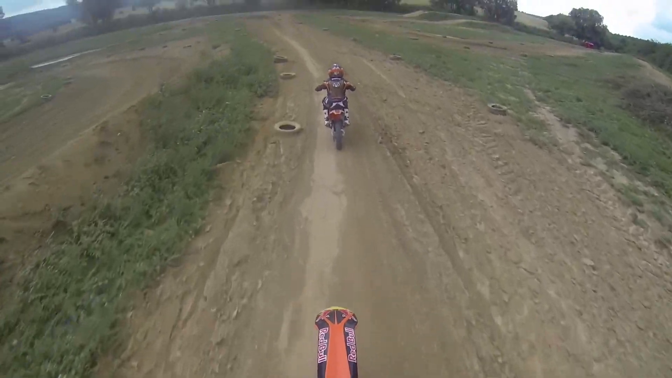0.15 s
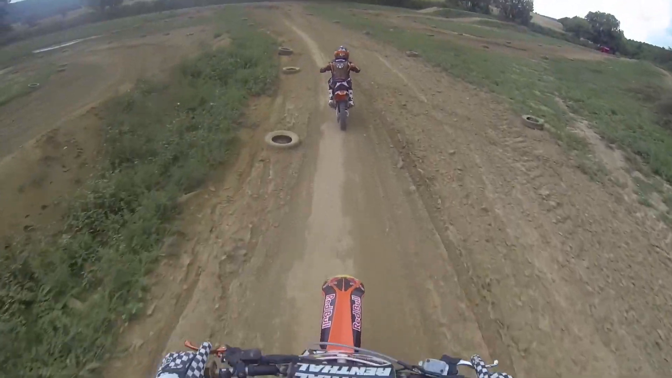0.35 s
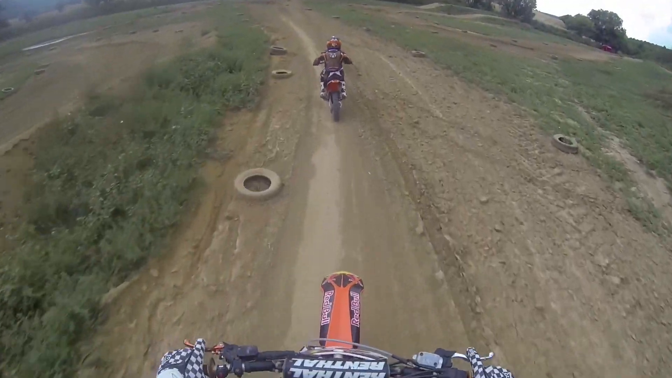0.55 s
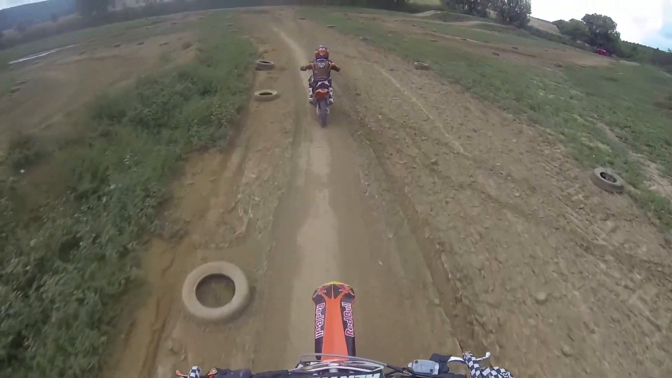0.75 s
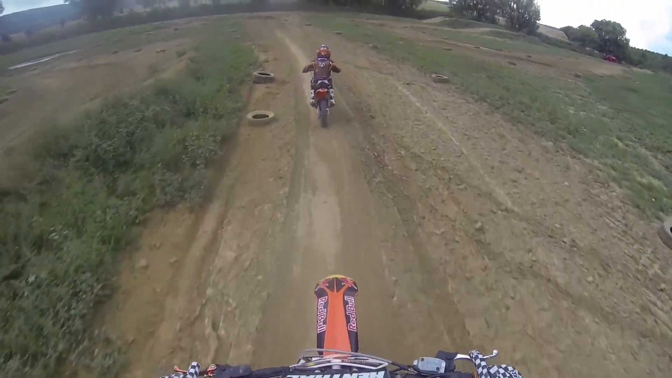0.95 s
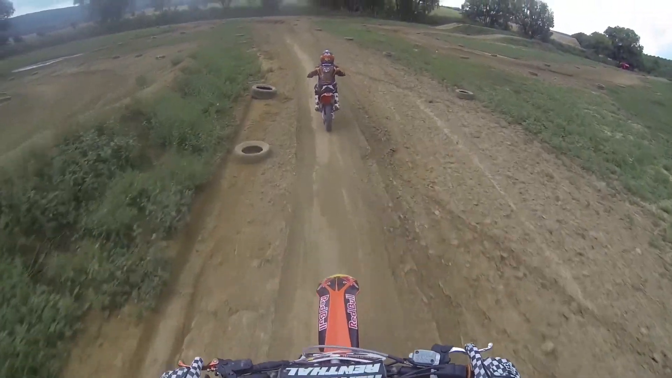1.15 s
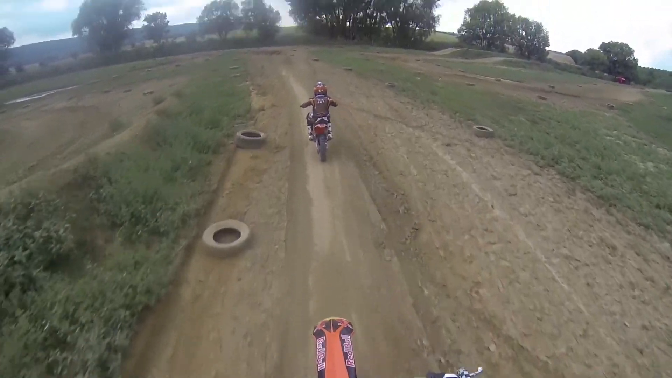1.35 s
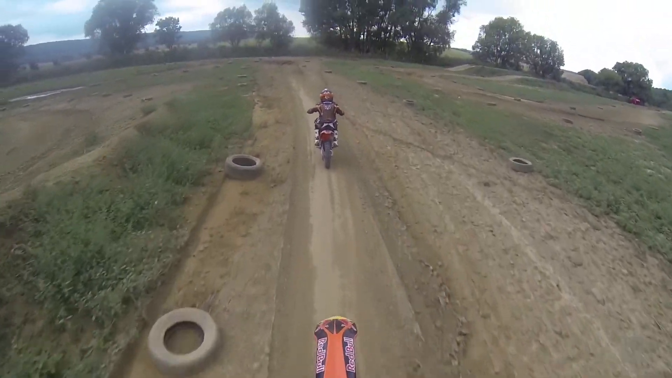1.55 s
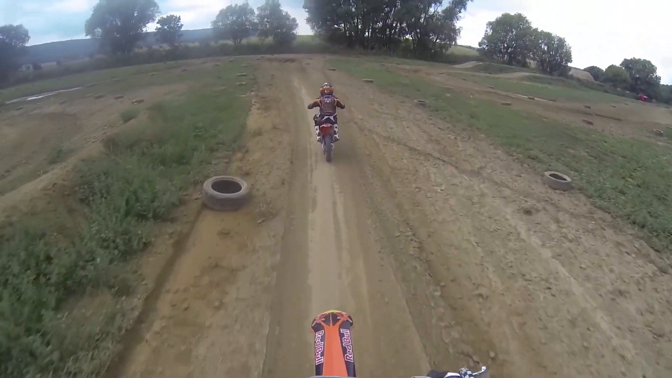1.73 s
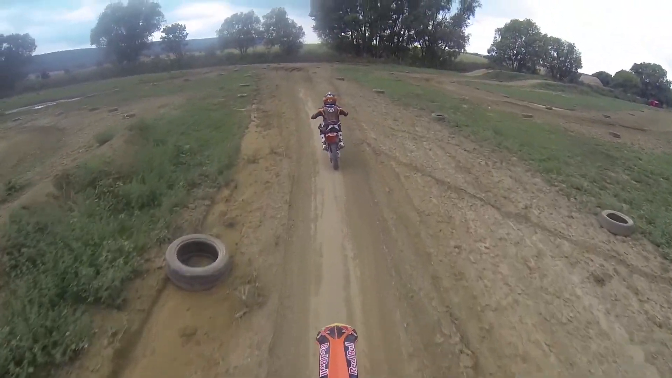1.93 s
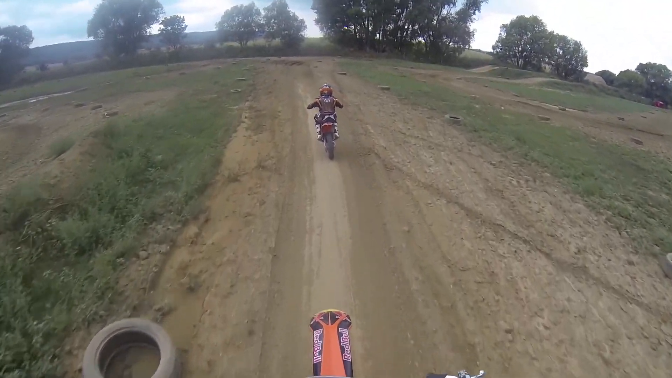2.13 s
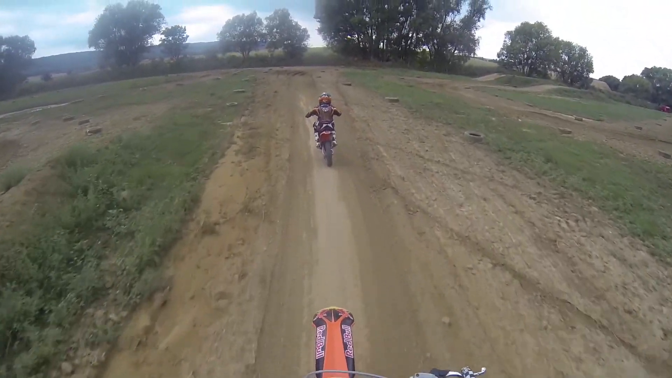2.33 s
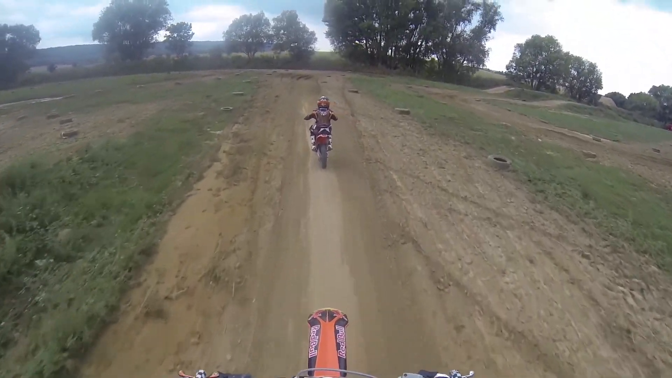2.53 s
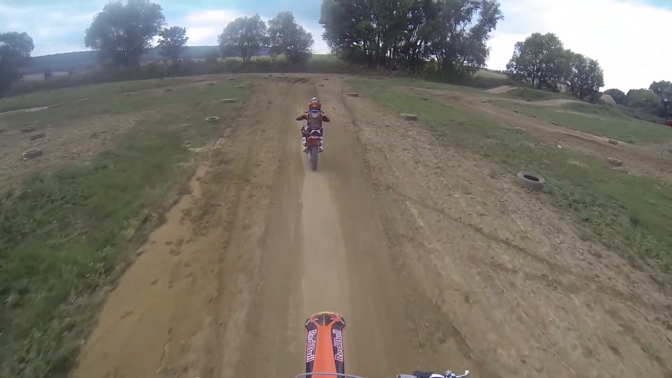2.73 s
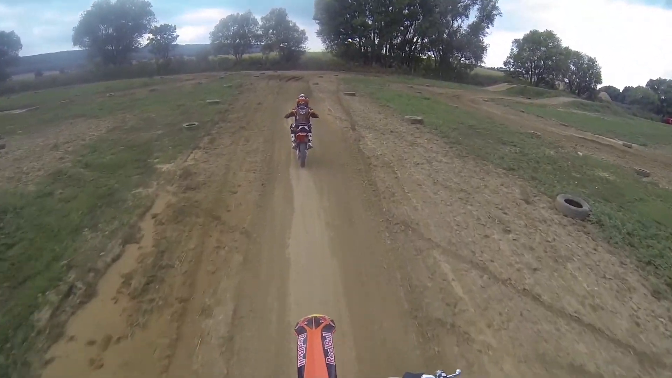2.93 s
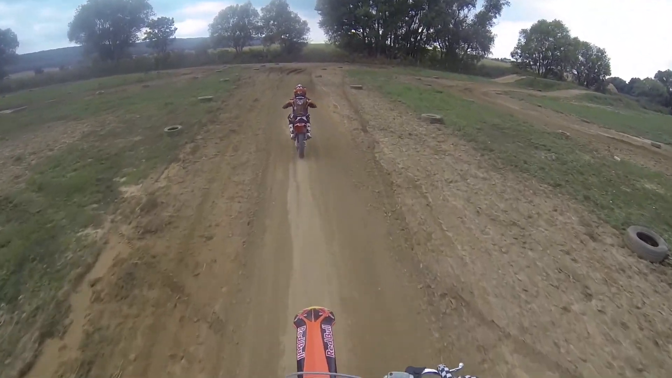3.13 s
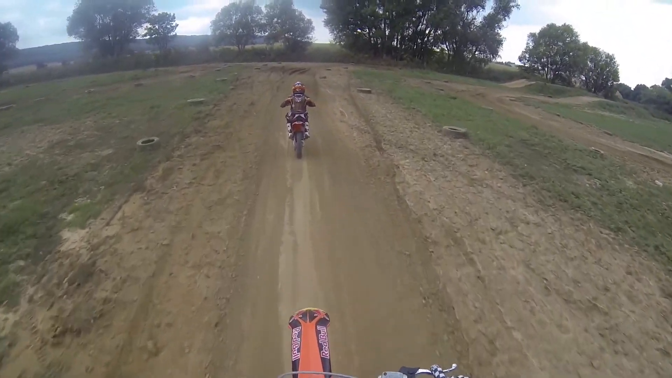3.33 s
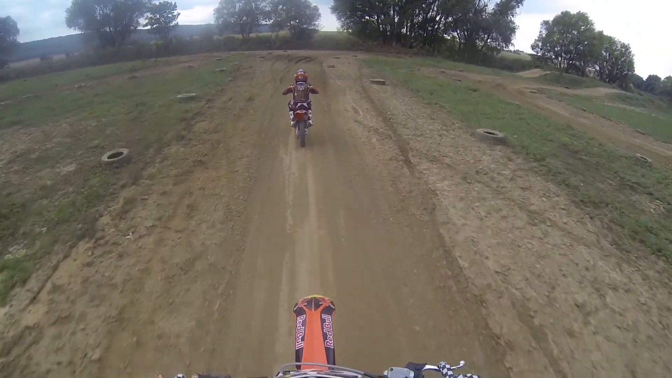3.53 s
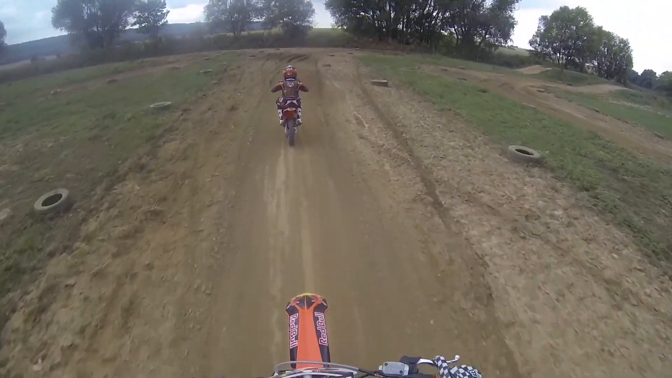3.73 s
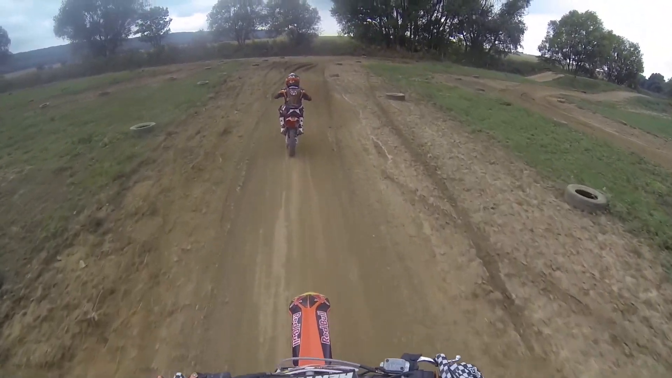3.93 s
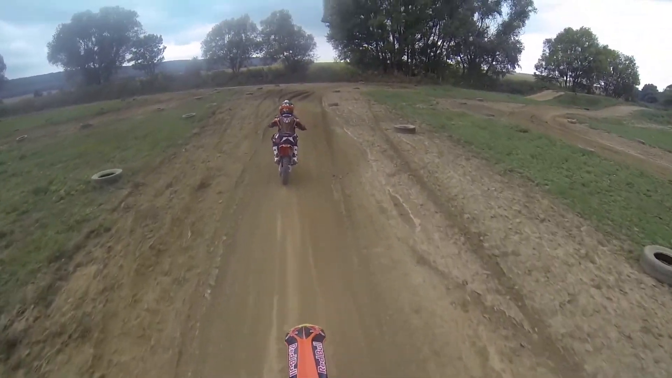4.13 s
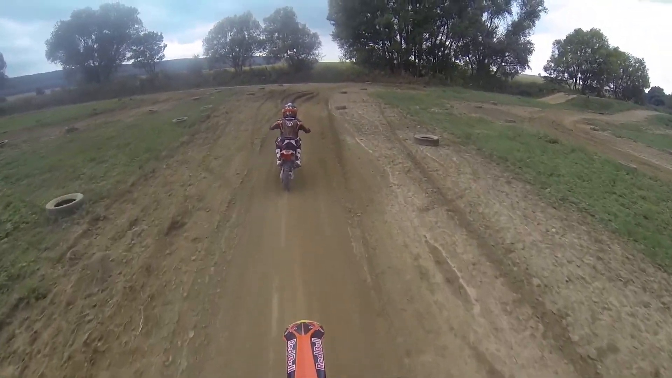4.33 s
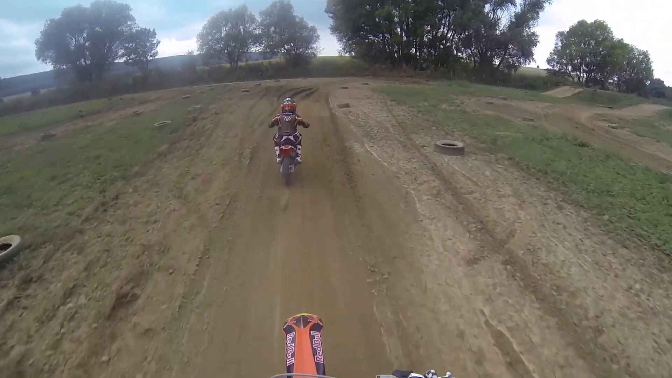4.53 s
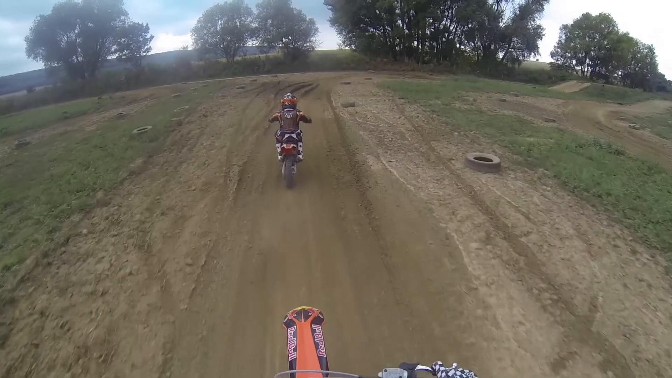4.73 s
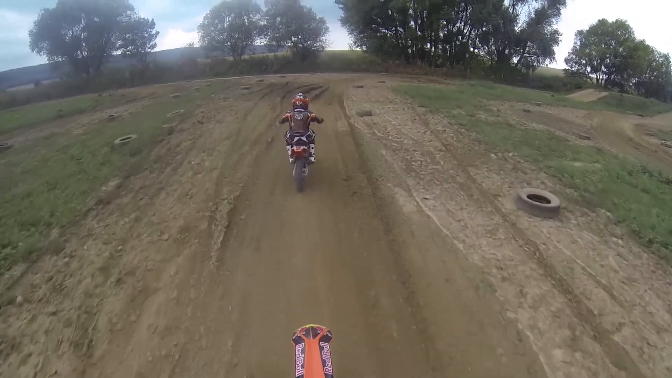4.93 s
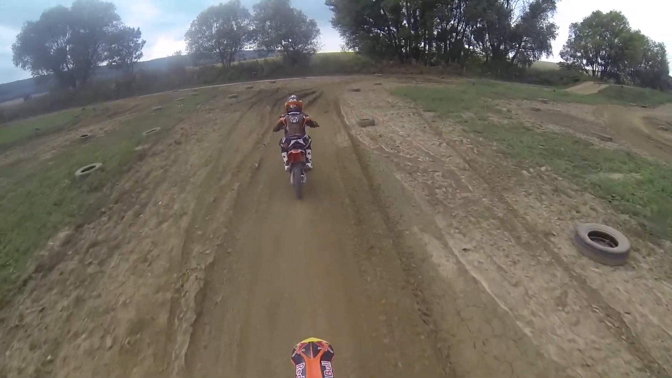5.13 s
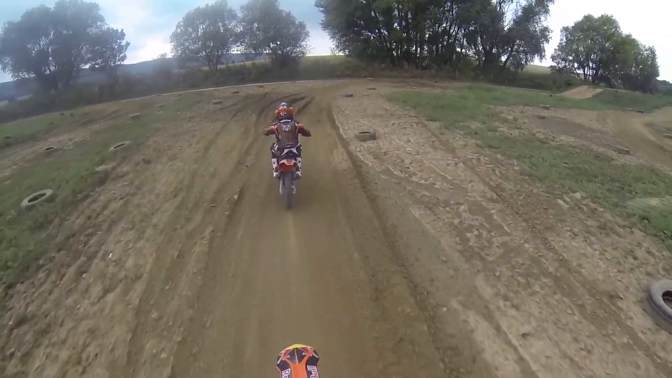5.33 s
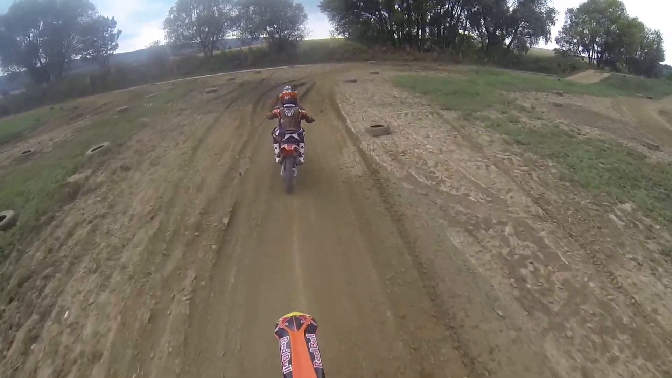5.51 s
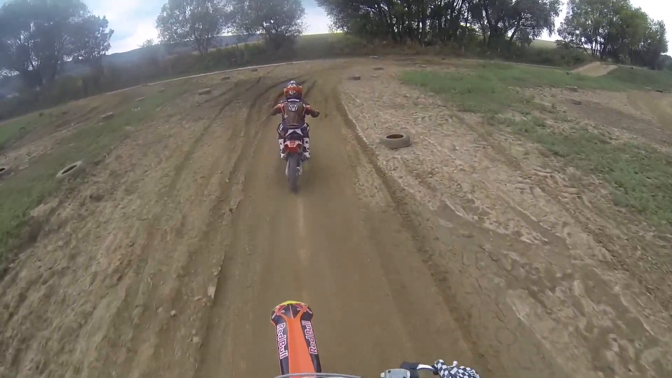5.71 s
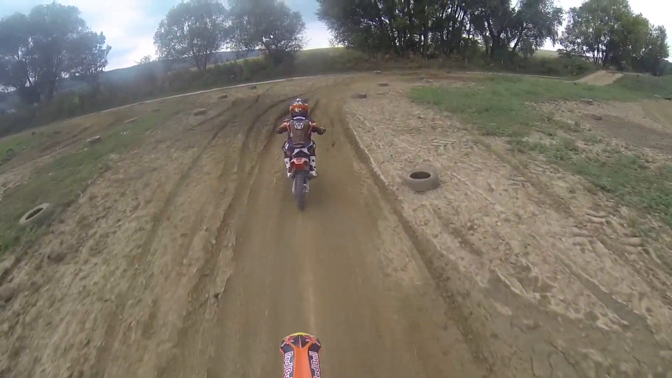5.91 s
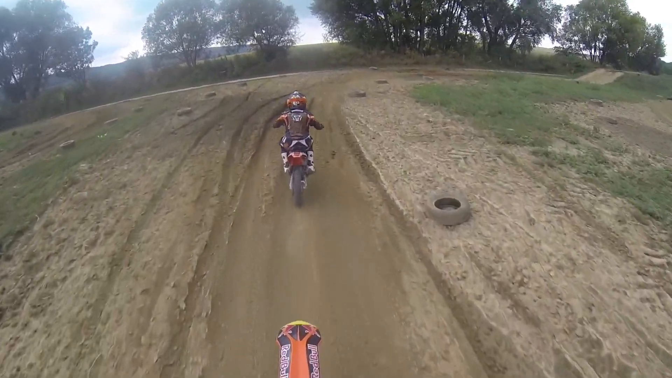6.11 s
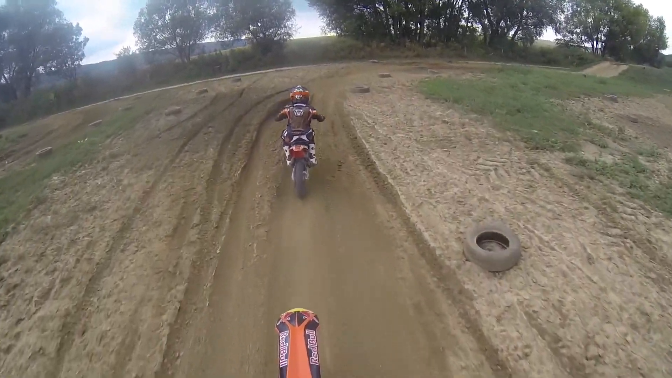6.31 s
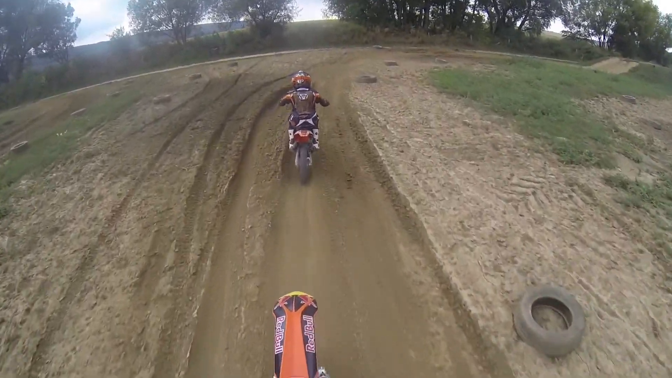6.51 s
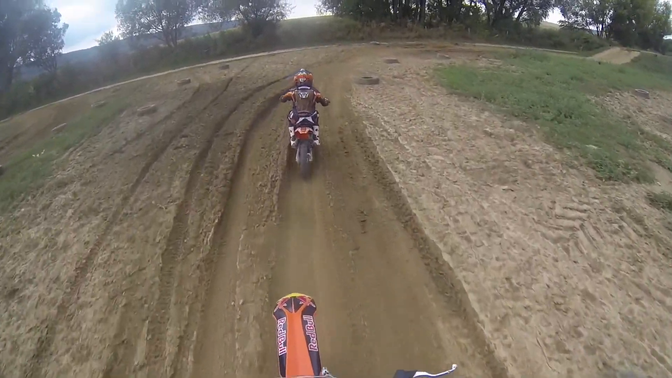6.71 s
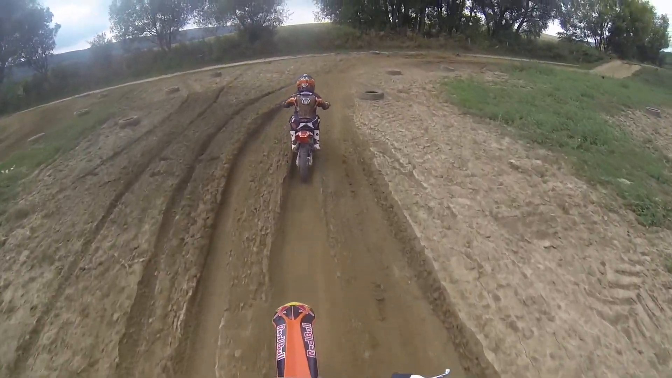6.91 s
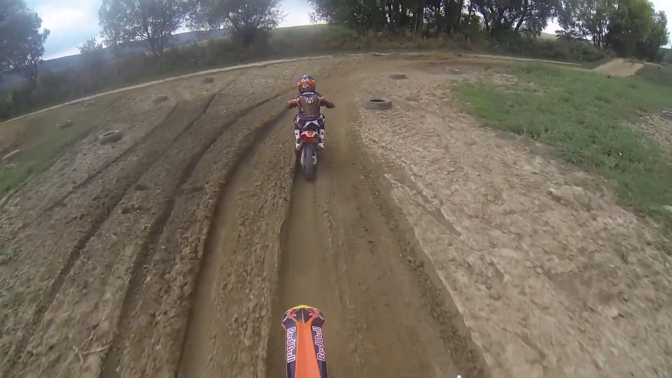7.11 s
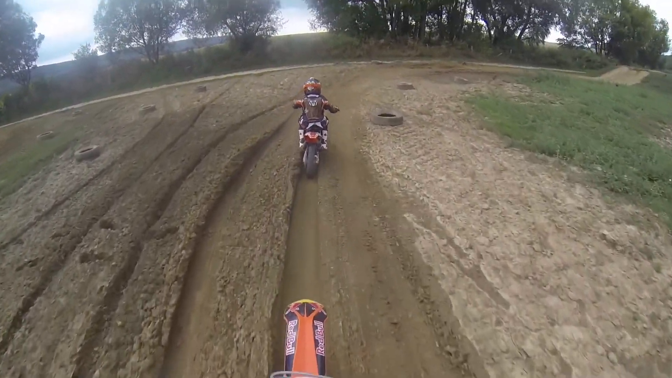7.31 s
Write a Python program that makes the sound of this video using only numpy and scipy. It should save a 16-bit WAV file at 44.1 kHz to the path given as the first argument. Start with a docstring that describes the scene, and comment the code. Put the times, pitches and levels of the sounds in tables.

```python
"""A low engine throb, wind rumble and hollow rush are heard at once, over the buzz of a small two-stroke ahead.
A camera in a sealed case rides a single-cylinder four-stroke dirt bike: crank orders shake the case as
sine lines, and firings excite resonances. Noise in puffs rings the cavities of the case as air and rasp,
shaped noise buffets the microphone, and resonance-weighted harmonics make the two-stroke.
Thrown stones, grit and exhaust pops ring decaying modes; a gain control acts on the sum."""
import sys
import numpy as np
from scipy import signal
from scipy.fft import rfft, irfft
from scipy.io import wavfile
from scipy.ndimage import uniform_filter1d

SR = 44100
rng = np.random.default_rng(int(sys.argv[2]) if len(sys.argv) > 2 else 0)


def store_wav(level_fs):
    """Save 16-bit WAV to argv[1]."""
    pcm = np.round(np.clip(np.atleast_2d(level_fs), -1, 1) * 32767)
    wavfile.write(sys.argv[1], SR, pcm.T.astype(np.int16))


N = 328986  # samples

# Speed of the crank. Each row: time in seconds, turns in Hz.
CRANK_SPEED = [(0, 62.7), (.2, 59.5), (1.49, 58.93), (1.66, 55.44), (1.85, 59.9), (2.02, 56.46), (2.3, 58),
               (2.55, 64), (2.66, 61.6), (3.35, 67.3), (3.59, 67), (3.75, 65), (4.0, 68), (4.35, 67.5),
               (4.67, 65.16), (5.01, 62.56), (5.19, 51.5), (5.36, 49.43), (5.6, 40.73), (6.92, 41),
               (7.01, 50.5), (7.06, 48.5), (7.135, 40), (7.18, 48), (7.3, 55), (7.335, 62), (7.46, 67)]
# Engine load. Each row: time in seconds, share of the noise in firing puffs (0-1, scaled down for air and rasp).
PUFF_SHARE = [(4.2, .33), (5.5, .15), (6.88, .15), (6.93, .98), (7.46, .95)]
# Shaking of the case by the first crank order. Each row: time in seconds, level in dB.
FIRST_ORDER = [(0, -37), (.45, -44), (.62, -32.5), (1.05, -30), (1.49, -24), (1.62, -31), (2.01, -24.5),
               (2.18, -31), (2.4, -23), (2.66, -30), (3.51, -20), (3.78, -24.5), (3.95, -21.5),
               (4.22, -19.5), (4.43, -27), (4.82, -19), (5.01, -27.5), (5.19, -27.5), (5.5, -35.5),
               (5.62, -40), (6.5, -57.5), (6.63, -30), (6.92, -33), (7.21, -24.5), (7.36, -31.5),
               (7.46, -28.5)]
# Second crank order. Each row: time in seconds, level in dB.
SECOND_ORDER = [(5.5, -44), (5.56, -54), (5.66, -44), (6.13, -54), (6.25, -42), (6.57, -51), (6.65, -40),
                (7.0, -45)]
# Half order, swelling as the bike starts to pull: from and to in seconds, level within and outside in dB.
HALF_ORDER = (2.52, 3.62, -33, -52)
# Upper crank orders. Each row: multiple of crank turns, level in dB over the thud before STEADY_PULL is added.
UPPER_ORDERS = [(2.5, 1.5), (3, -3), (3.5, -6), (4.5, -11)]
# Upper orders firm up under steady pull: from and to in seconds, change within and outside in dB.
STEADY_PULL = (2.3, 5.05, -4, -10)
# Rush and thud. Each row: time in seconds, rush of air in dB, exhaust thud in dB.
RUSH_AND_THUD = [(0, -35, -41), (.98, -37, -43.5), (1.06, -34.5, -43), (1.18, -36.5, -44),
                 (2.3, -35.5, -40), (3.4, -33.5, -39), (4.2, -35.5, -41), (4.95, -35.5, -41),
                 (5.5, -42, -43.5), (6.35, -43.5, -46), (6.88, -41.5, -50.5), (6.95, -41.5, -42.5),
                 (7.05, -36.5, -41), (7.12, -39, -41), (7.46, -38, -41.5)]
# Spectrum of the dull thud. Each row: frequency in Hz, relative density in dB per Hz.
THUD_SPECTRUM = [(60, -17), (120, 1.5), (190, 0.5), (290, -3), (430, -5), (520, -14.5), (900, -16),
                 (1100, -28.5), (4000, -99)]
# Exhaust pipe resonances, rung by each sharp firing. Each row: centre in Hz, width of one pass in Hz, relative dB.
PIPE_RESONANCES = [(150, 75, -3.5), (261.2, 68, 0.5), (414, 200, -16)]
FIRING_S = 7.157  # the moment of one firing
# Cavities of the case. Each row: centre in Hz, nominal width in Hz, relative level in dB.
CASE_CAVITIES = [(779, 190, -16), (1349, 218, 3), (1583, 246, 0), (2130, 420, -6.5), (2348, 120, -6),
                 (2984, 130, -12.5), (3163, 227, -11), (3720, 310, -18.5), (5136, 480, -29),
                 (6510, 550, -33), (7900, 500, -46.5), (10160, 630, -47)]
# Broad hiss between the cavities. Each row: frequency in Hz, relative level in dB.
HISS_SPECTRUM = [(400, -20.5), (4000, -30), (7000, -44), (12000, -54), (13900, -57), (14400, -66.5)]
# Cavities near 3 kHz, rung by the rasp. Each row: time in seconds, relative level in dB.
RASP_LEVEL = [(0, -3.5), (1.1, 0.5), (2.1, -1), (2.6, 2.5), (3.3, 1), (5.1, 2), (7.2, 4)]
RASP_LEAD = .32  # crank turns by which the rasp comes before the thud
TREBLE_DB = -16.5  # steady treble against the rush of air
FRESH_DB, FRESH_S = 3, 0.44  # the treble starts out rougher and brighter, then settles
# Short treble bursts: early ones perhaps sprayed dirt, those near 7 s in time with the exhaust rasp.
# Each row: time in seconds, dB over the steady treble.
TREBLE_BURSTS = [(.4, 4), (1.555, 6), (1.59, 7), (6.98, 3), (7.033, 7), (7.064, 10), (7.153, 4), (7.2, 4)]
# Wind buffeting. Each row: time in seconds, level in dB.
BUFFET_LEVEL = [(0, -30.5), (1.6, -31.5), (5.2, -37), (5.7, -40)]
# Spectrum of the buffeting. Each row: frequency in Hz, relative density in dB per Hz.
BUFFET_SPECTRUM = [(3, 1), (12, 11), (30, -2), (85, 3), (130, -26), (300, -71), (2000, -110)]
# Gusts. Each row: time in seconds, dB over the buffeting.
WIND_GUSTS = [(1.35, 6), (5.28, 14), (5.85, 2.5)]
GUST_S = 0.042  # from the peak of a gust until its dB swell has fallen to 1/e
# The two-stroke, one table a burst of throttle. Each row: time in seconds, firings in Hz,
# then the low, middle and top resonance levels in dB.
TWO_STROKE_BURSTS = [
    [(0, 127, -49, -62, -62), (.136, 131.8, -51, -55, -64), (.262, 126.3, -53, -52, -66),
     (.408, 134.6, -52, -54, -62), (.54, 122.3, -64, -48, -57), (.666, 123.7, -61, -49, -58),
     (.84, 117.8, -61, -53, -66), (1.08, 124.6, -60, -48, -55), (1.228, 113.8, -60, -56, -55),
     (1.45, 114.4, -59, -63, -53), (1.49, 117.3, -65, -51, -58), (1.56, 117.7, -64, -49, -54),
     (1.6, 121, -66, -59, -64), (1.75, 118.7, -72, -59, -66)],
    [(6.97, 74, -64, -62, -70), (7.07, 77.6, -56, -58, -66), (7.19, 75.5, -57, -62, -70),
     (7.25, 78.2, -54, -58, -68), (7.36, 78, -68, -69, -72)],
]
# Exhaust resonances of the two-stroke. Each row: centre in Hz, width in Hz.
TWO_STROKE_CHAMBER = [(650, 150), (850, 140), (1020, 90)]
# The two-stroke rings the main cavity of the case: centre in Hz, width in Hz, until seconds, dB before, dB after.
CASE_LEAK = (1350, 150, 1.15, -43, -55)
STUTTER_S, STUTTER_DB = .42, -3  # end of the stutter, and level of its lines against whole multiples
# Grit. Each row: time in seconds, peak in dB, tilt of the ring in dB an octave.
GRIT_HITS = [(3.7155, -16, 0), (3.7284, -30, -6), (3.7389, -28, -4)]
# Modes of grit on the mount. Each row: frequency in Hz, relative level in dB, 60 dB decay in seconds.
MOUNT_MODES = [(820, -1, .012), (1400, 1, .01), (3780, 3, .011), (5340, 0, .014), (8630, 0, .016),
               (13300, -13, .004)]
# A stone. Each row: time in seconds, peak in dB, tilt of the ring in dB an octave.
STONE_HITS = [(3.967, -.3, 0)]
# Modes of the case and metal behind it. Each row: frequency in Hz, relative level in dB, 60 dB decay in seconds.
METAL_MODES = [(850, -22, .016), (1400, -15, .015), (2250, -21, .012), (3850, -17, .014), (5120, -9, .017),
               (6340, 0, .018), (8180, -9, .007), (10950, -21, .008), (12600, -36, .012), (4897, -31, .15),
               (5561, -33, .19), (5657, -33, .21), (6460, -41, .3), (6760, -35, .085), (7208, -46, .1)]
# Exhaust pops of the two-stroke. Each row: time in seconds, peak in dB, tilt of the ring in dB an octave.
EXHAUST_POPS = [(6.7417, -41, 0), (6.7696, -42, 0), (6.799, -45, 0)]
# Modes of a pop. Each row: frequency in Hz, relative level in dB, 60 dB decay in seconds.
POP_MODES = [(660, 0, .03), (810, -1, .03)]
LIMIT_DB, RECOVER_DB_PER_S = -13, 40  # gain control: threshold, and fall of its level detector
SQUEEZE = .55  # dB of reduction for each dB over the threshold
WHINE_HZ, WHINE_DB = 11000, -71.5  # camera electronics: pitch, and mean level of the peaks
EDGE_HZ = 15250  # band limit


def gain_of(db):
    """Decibels are twenty times the logarithm of an amplitude ratio; this inverts them."""
    return 10 ** (np.asarray(db) / 20)


def evened(x):
    """Normalisation: dividing by the root mean square leaves rms 1."""
    return x / np.sqrt(np.mean(x ** 2) + 1e-20)


def curves(rows):
    """Linear interpolation in time turns each column after the first into N samples."""
    s, *columns = np.transpose(rows)
    return [np.interp(np.arange(N) / SR, s, c) for c in columns]


def window(start, end, in_db, out_db):
    """Piecewise-linear envelope: a level in dB that differs for a while."""
    return curves([(start - .1, out_db), (start, in_db), (end, in_db), (end + 0.17, out_db)])[0]


def read(points, hz):
    """Spectral interpolation: dB points on a logarithmic frequency axis become gains."""
    f, db = np.transpose(points)
    return gain_of(np.interp(np.log(hz + 1), np.log(f + 1), db))


def coloured(x, shape):
    """Minimum-phase filtering: a folded cepstrum makes the gain shape(hz) causal; the result has rms 1."""
    cepstrum = irfft(np.log(shape(np.fft.rfftfreq(16384, 1 / SR)) + 1e-6))
    cepstrum[1:8192] *= 2
    cepstrum[8193:] = 0
    impulse_response = irfft(np.exp(rfft(cepstrum)))
    return evened(signal.oaconvolve(x, impulse_response)[:N])


def drift(hz):
    """Low-passed chance: slow random variation of rms 1."""
    rate = 400  # steps a second
    steps = rng.standard_normal(int(N / SR * rate) + 2)
    steps = signal.lfilter(*signal.butter(1, np.clip(hz / 200, .001, .95)), steps)
    return evened(np.interp(np.arange(N) / SR * rate, np.arange(len(steps)), steps))


def resonate(x, hz, width):
    """Heterodyne resonance: shift hz to zero, smooth with one pole, shift back; peak gain 1."""
    turn = np.exp(2j * np.pi * np.cumsum(hz * np.ones(len(x))) / SR)
    r = np.exp(-np.pi * width / SR)
    return 2 * (turn * signal.lfilter([1 - r], [1, -r], x / turn)).real


def puffed(turns, share, duty, uneven_db):
    """Amplitude-modulated noise: part steady, part in one dying puff for every second crank turn."""
    cycle = turns / 2
    strength = gain_of(uneven_db * rng.standard_normal(1000))[cycle.astype(int)]
    decay = np.exp(-(cycle % 1) / duty)
    puffs = evened(uniform_filter1d(strength * decay, size=200))  # soft start
    share = np.clip(share, 0, 1)
    return rng.standard_normal(N) * np.sqrt(1 - share + share * puffs ** 2)


def patchy(x, depth_db):
    """Time-frequency modulation: louder and quieter clumps, a few hundred Hz wide and some 40 ms long."""
    z = signal.stft(x, nperseg=512)[2]
    clumps = uniform_filter1d(rng.standard_normal(z.shape), size=3, axis=0)
    clumps = uniform_filter1d(clumps, size=7, axis=1)
    return signal.istft(z * gain_of(depth_db * evened(clumps)), nperseg=512)[1][:N]


def engine():
    """Periodic forcing: crank orders as sine lines, and a resonant thud per firing; also returns crank turns."""
    (hz,), (shake_db,), (share,) = curves(CRANK_SPEED), curves(FIRST_ORDER), curves(PUFF_SHARE)
    thud_db = curves(RUSH_AND_THUD)[1]
    turns = np.cumsum(hz) / SR
    turns += 1000 - turns[round(FIRING_S * SR)]  # a firing falls on every even turn
    wobble = .018 * drift(hz=4)  # the flywheel runs unevenly, in turns

    def order(k, db, waver_db):
        """Harmonic of the crank: sine phase gives a quick push at each turn, then a slow return."""
        phase = k * (turns + wobble) - .25
        return np.sqrt(2) * gain_of(db + waver_db * drift(hz=18.0)) * np.cos(2 * np.pi * phase)

    lines = order(1, shake_db, 1)
    lines += order(2, curves(SECOND_ORDER)[0] + drift(hz=4.1), 0.96)
    lines += order(1 / 2, window(*HALF_ORDER), 1.6)
    upper_db = thud_db + window(*STEADY_PULL)
    lines += sum(order(k, upper_db + db, 2.5) for k, db in UPPER_ORDERS)

    firings = np.floor(turns / 2)
    beat = evened(np.diff(firings, prepend=firings[0]))  # one click a firing
    sharp = evened(sum(gain_of(db) * resonate(resonate(beat, f, w), f, w) for f, w, db in PIPE_RESONANCES))
    dull = coloured(puffed(turns, share, duty=0.7, uneven_db=0.5), lambda f: read(THUD_SPECTRUM, f))
    clean = share ** 3  # under full load the thuds are sharp and alike
    thud = np.sqrt(clean) * sharp + np.sqrt(1 - clean) * dull
    return lines + gain_of(thud_db) * thud, turns


def rush(turns):
    """Cavity resonance: air and exhaust rasp leak in and ring the case; short bursts lift the treble."""
    level_db = curves(RUSH_AND_THUD)[0]
    share = curves(PUFF_SHARE)[0] * gain_of(window(0, 7.3, 0, -6))  # the puffs blur as the revs climb
    air = patchy(puffed(turns + RASP_LEAD, .2 * share, duty=.3, uneven_db=2.5), 1.6)
    rasp = puffed(turns + RASP_LEAD, .62 * share, duty=.2, uneven_db=2.5)

    def cavities(f):
        """Superposition of powers: resonance peaks over the hiss."""
        peaks = sum(gain_of(2 * db) / (1 + ((f - hz) / (0.65 * w)) ** 2) ** 2 for hz, w, db in CASE_CAVITIES)
        return np.sqrt(peaks + read(HISS_SPECTRUM, f) ** 2)

    def band(x, steepness, hz, kind):
        """Butterworth filtering: a maximally flat pass band."""
        return signal.sosfilt(signal.butter(steepness, hz, kind, fs=SR, output="sos"), x)

    airy, raspy = coloured(air, cavities), coloured(rasp, cavities)
    low = band(airy, 8, 2650, "low")
    middle = gain_of(curves(RASP_LEVEL)[0]) * band(raspy, 4, (2650, 4400), "band")
    treble = evened(band(airy, 4, 4400, "high"))
    burst_s, burst_peak_db = np.transpose(TREBLE_BURSTS)[:, :, None]
    since = np.arange(N) / SR - burst_s
    burst_db = (burst_peak_db * np.exp(-(since / 0.013) ** 2)).sum(0)
    fresh_db = window(0, FRESH_S, FRESH_DB, 0) * (1 + 0.55 * drift(hz=25))
    return gain_of(level_db) * (low + middle + gain_of(TREBLE_DB + fresh_db + burst_db) * treble)


def gusts():
    """Gaussian envelopes: short swells of wind, in dB."""
    s, db = np.transpose(WIND_GUSTS)[:, :, None]
    return (db * np.exp(-((np.arange(N) / SR - s) / GUST_S) ** 2)).sum(0)


def buffet():
    """Turbulent pressure: low-frequency noise with slow and quick random swells at the microphone."""
    swell_db = 0.93 * drift(hz=2.0) + 1.26 * drift(hz=19)
    lumps = coloured(rng.standard_normal(N) * gain_of(swell_db), lambda f: read(BUFFET_SPECTRUM, f))
    return gain_of(curves(BUFFET_LEVEL)[0] + gusts()) * lumps


def two_stroke(rows):
    """Source and filter: harmonics of the firing rate take the level of nearby resonances, each wavering alone."""
    span = slice(round(rows[0][0] * SR), round(rows[-1][0] * SR))
    hz, *levels_db = [c[span] for c in curves(rows)]
    levels_db.append(window(0, *CASE_LEAK[2:])[span])
    resonances = [*TWO_STROKE_CHAMBER, CASE_LEAK[:2]]
    firings = np.cumsum(hz * (1 + .006 * drift(hz=40)[span])) / SR
    t = np.arange(N)[span] / SR
    out = np.zeros(N)
    # lines a third either side of the fifth multiple: at first every third firing is stronger
    for k in [*range(4, 13), 14 / 3, 16 / 3]:
        power = sum(gain_of(2 * db) / (1 + ((k * hz - f) / (w / 2)) ** 4)
                    for db, (f, w) in zip(levels_db, resonances))
        if k % 1 != 0:
            power *= gain_of(2 * STUTTER_DB) * (t < STUTTER_S)
        waver = gain_of(1.8 * drift(hz=8)[span])
        out[span] += np.sqrt(2 * power) * waver * np.cos(2 * np.pi * k * firings)
    out[span] *= np.clip(np.minimum(t - t[0], t[-1] - t) / 0.015, 0, 1)  # fade in and out
    return out


def hits(events, modes, rise, crack_db):
    """Modal excitation: every blow rings the same decaying modes, a little differently; rise in seconds."""
    out, t = np.zeros(N), np.arange(SR // 3) / SR
    for s, peak_db, tilt_db in events:
        spread = rng.standard_normal((len(modes), 2))
        ring = gain_of(crack_db - 60 * t / 0.00575) * rng.standard_normal(len(t))  # crack of first contact
        for (hz, db, t60), (a, b) in zip(modes, spread):
            mode_db = db + tilt_db * np.log2(hz / modes[0][0]) + 0.57 * a
            ring += gain_of(mode_db - 60 * t / t60) * np.sin(2 * np.pi * hz * t + 0.21 * b)
        ring *= (1 - np.exp(-t / rise)) ** 2
        part = out[round(s * SR):][:len(t)]
        part += gain_of(peak_db) * (ring / abs(ring).max())[:len(part)]
    return out


def scene():
    """Superposition: the pressures of all sources add at one microphone."""
    motor, turns = engine()
    ahead = sum(map(two_stroke, TWO_STROKE_BURSTS))
    grit = hits(GRIT_HITS, MOUNT_MODES, rise=.0002, crack_db=-7)
    stone = hits(STONE_HITS, METAL_MODES, rise=.0002, crack_db=-30)
    pops = hits(EXHAUST_POPS, POP_MODES, rise=.001, crack_db=-20)
    return (motor + rush(turns) + buffet() + ahead + grit + stone + pops)[None]


def record(dry):
    """Dynamic compression: loud sound lowers the gain; a faint electronic whine is added, then the band limit."""
    power_db = 10 * np.log10(abs(uniform_filter1d(dry[0] ** 2, size=100)) + 1e-12)
    fall = np.arange(N) * RECOVER_DB_PER_S / SR
    held_db = np.maximum.accumulate(power_db + fall) - fall  # rises at once, falls steadily
    over_db = np.maximum(held_db - LIMIT_DB, 0)
    late_db = uniform_filter1d(over_db, size=401, origin=200)  # acts a few ms late
    whine = gain_of(WHINE_DB + drift(hz=30.3)) * np.sin(2 * np.pi * WHINE_HZ * np.arange(N) / SR)
    wet = dry / gain_of(SQUEEZE * late_db) + whine
    band_limit = signal.firwin(511, EDGE_HZ, window=("kaiser", 9), fs=SR)
    return signal.oaconvolve(wet, band_limit[None], "same")


dry = scene()
out = record(dry)
store_wav(out)
```